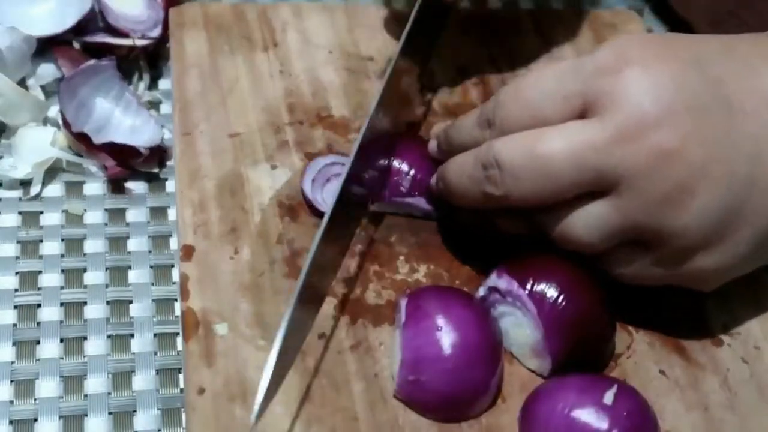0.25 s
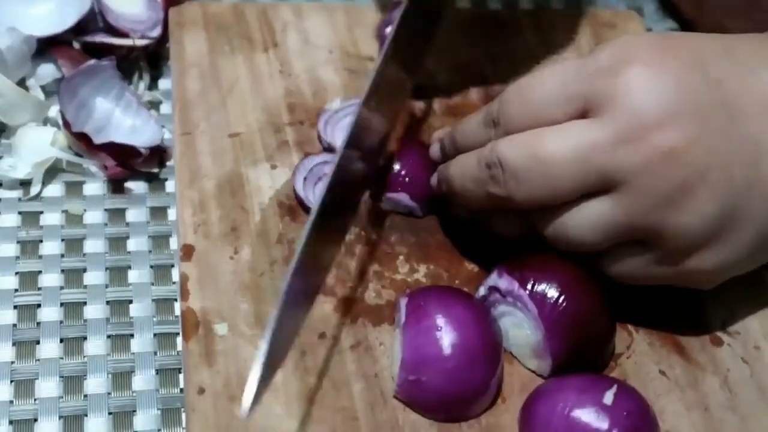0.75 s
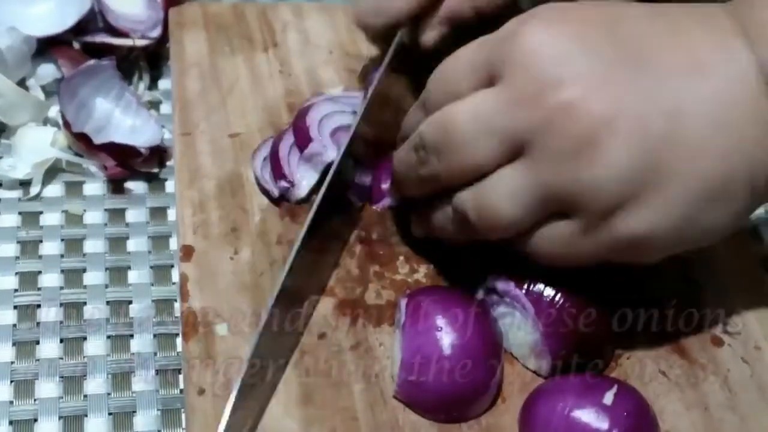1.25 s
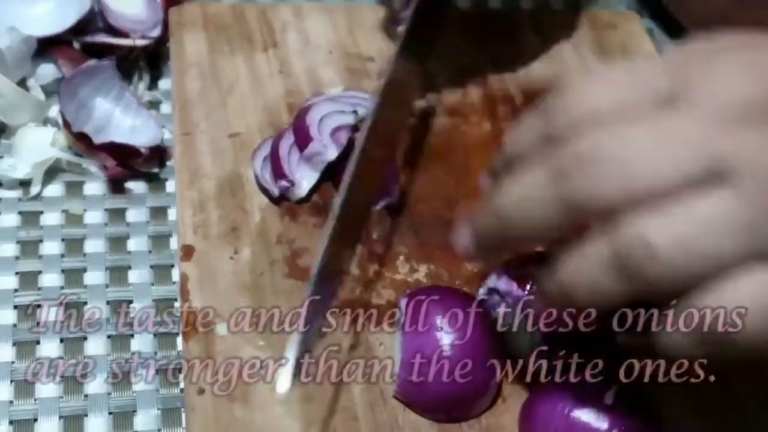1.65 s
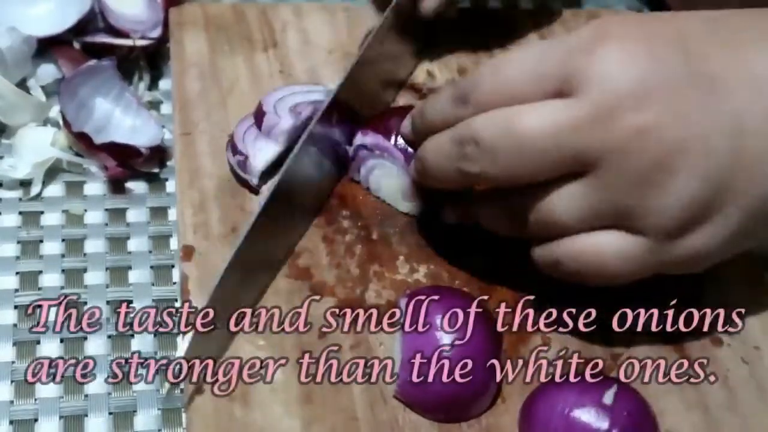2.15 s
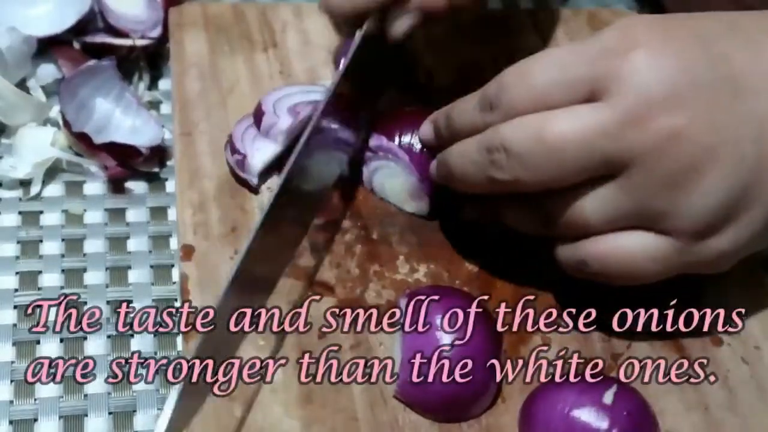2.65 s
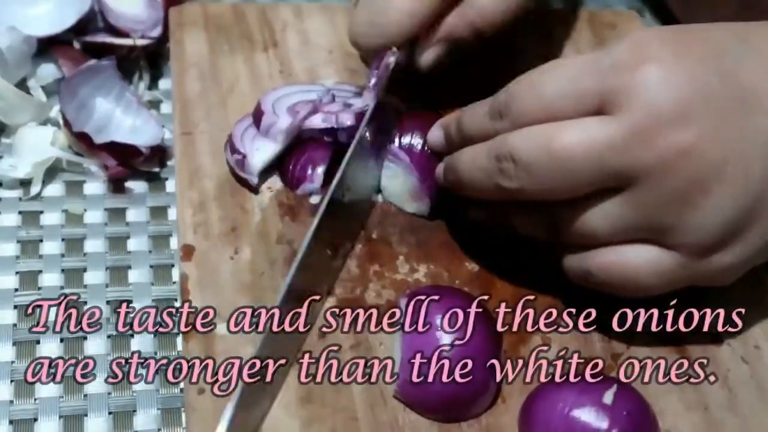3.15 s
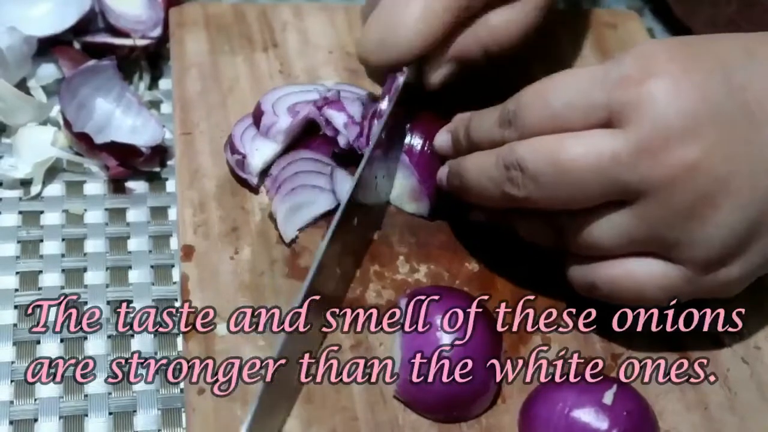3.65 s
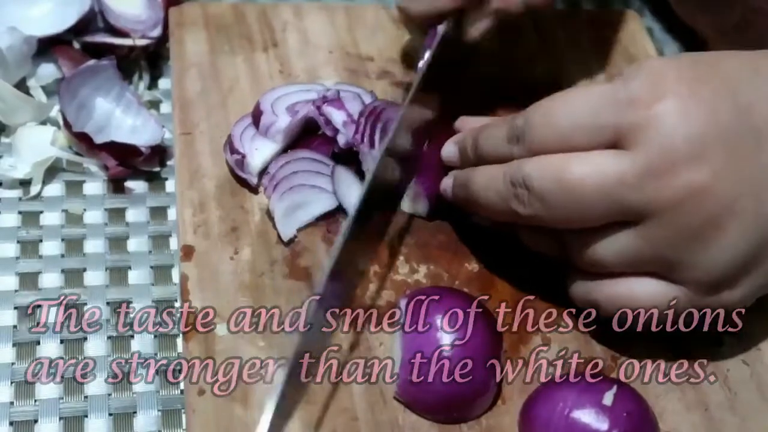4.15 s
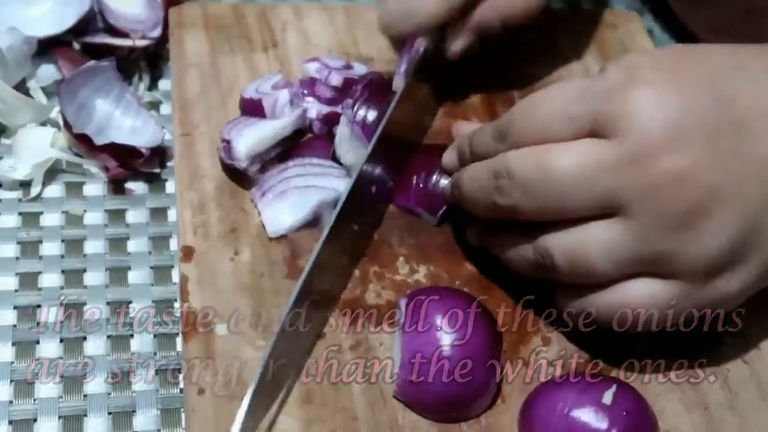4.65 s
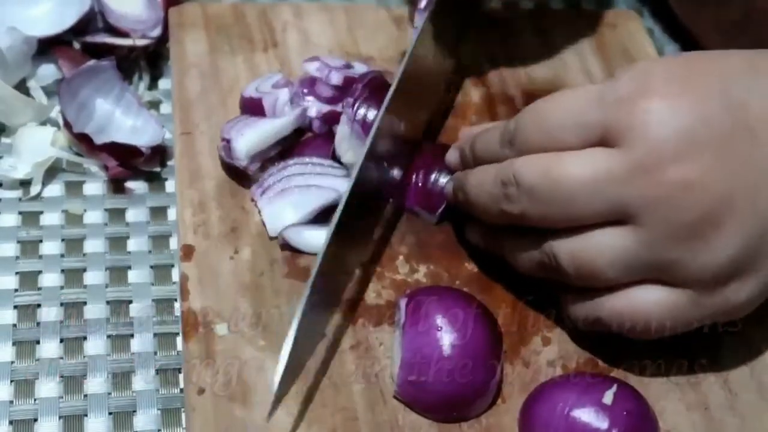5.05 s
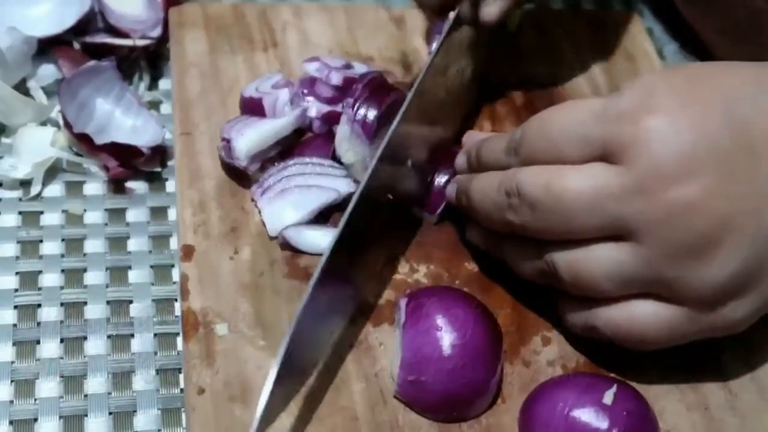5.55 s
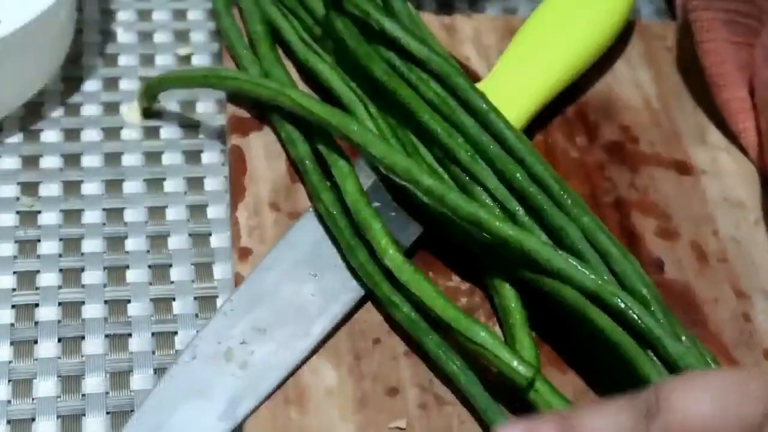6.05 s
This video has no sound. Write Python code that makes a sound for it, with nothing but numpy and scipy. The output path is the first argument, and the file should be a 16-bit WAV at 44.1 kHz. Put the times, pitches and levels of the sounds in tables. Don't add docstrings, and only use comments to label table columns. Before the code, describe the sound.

A knife crunches through wet onion and knocks on a wooden cutting board in uneven strokes, close up, over a faint wavering kitchen hum.

```python
import sys
import numpy as np
from scipy import signal
from scipy.fft import rfft, irfft, next_fast_len
from scipy.io import wavfile
from scipy.ndimage import uniform_filter1d

SR = 44100
rng = np.random.default_rng(int(sys.argv[2]) if len(sys.argv) > 2 else 0)


def volts(x):
    e = np.asarray(x, float) / 20
    return 10 ** e


def transcribe(signal):
    frames = np.atleast_2d(signal).T
    limited = np.clip(frames, -1, 1)
    pcm = np.round(limited * 32767).astype(np.int16)
    wavfile.write(sys.argv[1], SR, pcm)


N = 277314


def evened(x):
    return x / np.sqrt(np.mean(x ** 2) + 1e-20)


def read(points, hz):
    f, value = np.transpose(points)
    return np.interp(np.log(hz + 1), np.log(f + 1), value)


# (frequency [Hz], share [0-1])
TREBLE_SHARE = [(3000, 1), (6000, .6), (8000, .25), (10000, .12), (14000, .04)]


def thinned(x):
    hz, t, z = signal.stft(x, SR, nperseg=1024)
    share = np.clip(read(TREBLE_SHARE, hz), .02, 1)[:, None]
    draws = np.repeat(rng.random((len(t), len(hz))), 2, axis=0)[:len(t)].T
    kept = draws < share
    return signal.istft(z * (kept / np.sqrt(share) + .02), SR, nperseg=1024)[1][:, :N]


# (frequency [Hz], level [dB per Hz])
HUM_COLOUR = [(12, -65), (20, -16), (47, 1), (85, -10.5), (140, -10.5), (202, -6), (274, -10.5),
              (393, -19.5), (725, -17), (1010, -21.5), (1410, -24), (2330, -25.5), (2680, -27),
              (5530, -38.5), (15500, -59)]
# (frequency [Hz], likeness [-1 to 1])
HUM_LIKENESS = [(60, 1.0), (180, 1), (550, 0.73), (1650, 0.77), (4970, 0.12), (15000, -1.3)]
# (time [s], level [dB])
HUM_DRIFT = [(0, -51.5), (.5, -50.5), (.96, -51), (1.47, -42), (1.79, -46.5), (2.29, -42.5), (2.45, -53.5),
             (2.8, -44), (3, -50.5), (3.6, -51.5), (4.1, -48.5), (4.5, -46), (5.3, -42.5), (5.55, -50),
             (5.9, -44.5), (6.29, -45.5)]
RUMBLE_DB = 3
DUCK_FROM_DB, DUCK_SHARE, RECOVER_DB_PER_S = -43.5, 0.15, 103.5


def hum(board):
    frames, hz = N // 128 + 5, np.fft.rfftfreq(512, 1 / SR)
    a, b, c, d, patches = rng.standard_normal((frames, 257, 5)).T
    patches = uniform_filter1d(patches, 6, axis=0)
    patches = evened(uniform_filter1d(patches, 10, axis=1))

    same = np.clip(read(HUM_LIKENESS, hz), -1, 1)[:, None]
    left = a + 1j * b
    right = same * left + np.sqrt(1 - same ** 2) * (c + 1j * d)
    z = np.array([left, right])

    t = np.arange(frames) * 128 / SR
    power = abs(uniform_filter1d(board ** 2, size=1600))
    stroke_db = np.interp(t, np.arange(N) / SR, 10 * np.log10(power + 1e-12))
    bass = 1 / (1 + (hz[:, None] / 400) ** 2)
    hush_db = (1.5 - bass) * 0.13 * np.maximum(stroke_db + 29, 0)

    fall = t * RECOVER_DB_PER_S
    peak_db = np.maximum.accumulate(stroke_db + fall) - fall
    duck_db = DUCK_SHARE * np.maximum(peak_db - DUCK_FROM_DB, 0)

    s, level_db = np.transpose(HUM_DRIFT)
    drift_db = np.interp(t, s, level_db)
    colour_db = read(HUM_COLOUR, hz)[:, None] + bass * RUMBLE_DB
    z *= volts(colour_db + 1.8 * patches + drift_db - duck_db - hush_db)
    return volts(35.0) * signal.istft(z, nperseg=512, noverlap=384)[1][:, :N] / 30


# (frequency [Hz], time [s])
ECHO_TIME = [(200, 0.69), (900, 0.12), (2300, 0.033), (3500, 0.02), (9000, 0.016)]


def room(x):
    taps = np.zeros((2, 16000))
    at = np.arange(200, 15980, 20) + rng.integers(0, 20, (2, 789))
    np.put_along_axis(taps, at, rng.choice([-1., 1.], at.shape), 1)
    taps[1] = .98 * taps[0] + .15 * taps[1]
    hz, t, z = signal.stft(taps, SR, nperseg=256)
    tail = signal.istft(z * volts(-60 * t / read(ECHO_TIME, hz)[:, None]), SR, nperseg=256)[1]
    return signal.fftconvolve(x[None], tail / np.linalg.norm(tail[0]), axes=1)[:, :N]


def ring(modes, cycles=.5):
    t, x = np.arange(4096) / SR, np.zeros(4096)
    for k, (hz, width, db) in enumerate(modes):
        swell = (1 - np.exp(-t * hz / cycles)) ** 2
        x += (-1) ** k * volts(db) * swell * np.exp(-np.pi * width * t) * np.sin(2 * np.pi * hz * t)
    return x / abs(x).max()


def grains(per_s, spread_db):
    size = volts(spread_db * np.minimum(rng.exponential(1, N), 4)) * rng.choice([-1, 1], N)
    return size * (rng.random(N) < per_s / SR)


def clumps(size, depth_db):
    drift = evened(uniform_filter1d(rng.standard_normal(N), size))
    return evened(volts(depth_db * drift))


def rubbed(slips, gain, body):
    return signal.oaconvolve(evened(slips) * gain, body / np.linalg.norm(body))[:N]


# (time [s], length [s], crunch [dB], table push [dB])
LIGHT_TOUCHES = [(0.61, 0.0072, -55.5, -36), (.815, 0.0056, -62, -65), (0.995, 0.025, -52, -36),
                 (1.352, .012, -51.5, -50), (2.199, 0.03, -48, -47), (2.635, 0.027, -48, -41),
                 (2.723, 0.031, -55.5, -42), (3.134, 0.055, -54, -42), (3.426, 0.021, -48.5, -39.5),
                 (3.647, 0.023, -54.5, -62.5), (3.732, 0.019, -48, -44.5), (3.894, 0.027, -46.5, -36.5),
                 (3.948, 0.0083, -47.5, -42), (4.198, 0.007, -52, -54.5), (4.574, .015, -54, -32.5),
                 (4.917, 0.022, -50.5, -60), (5.249, 0.035, -45.5, -39), (5.445, 0.028, -64, -31),
                 (5.602, 0.0049, -54, -55), (5.699, 0.015, -48, -53)]
# (time [s], length [s], crunch [dB], rub on the board [dB], table push [dB])
LAYER_CUTS = [(.089, 0.035, -42.5, -38, -34), (0.432, 0.039, -37.5, -38, -31),
              (0.701, 0.049, -42.5, -39.5, -38.5), (1.018, 0.025, -42.5, -50, -34.5),
              (1.319, 0.029, -39.5, -34, -29.5), (1.576, 0.05, -45, -48, -41.5),
              (2.21, 0.032, -47, -37, -37.5), (2.354, 0.028, -37.5, -50, -38),
              (2.659, 0.031, -33.5, -63, -27), (2.864, .033, -27.5, -45, -23.5),
              (3.172, 0.032, -27.5, -37, -32), (3.408, .018, -39, -34, -29.5),
              (3.439, .016, -37.5, -56.5, -36.5), (3.68, 0.052, -43, -48, -33.5),
              (3.925, 0.021, -39, -43, -29), (3.956, 0.021, -34.5, -25.5, -26),
              (4.211, 0.057, -41, -41.5, -33.5), (4.74, 0.012, -36, -33, -27),
              (4.947, 0.029, -34, -32, -23.5), (5.22, 0.033, -41, -37, -35),
              (5.243, 0.011, -27.5, -30.5, -52), (5.459, 0.03, -35, -35, -42.5),
              (5.479, 0.018, -34.5, -33, -34), (5.736, 0.029, -30, -36.5, -26.5)]
# (time [s], length [s], lower ring [dB], upper ring [dB], table push [dB])
BOARD_SKIDS = [(0.121, 0.031, -34, -36, -41.5), (.466, 0.035, -35, -36, -44),
               (.742, 0.018, -36.5, -33, -39.5), (0.759, 0.011, -27, -38.5, -61),
               (1.043, 0.037, -26, -53, -27), (1.338, 0.012, -25.5, -44.5, -31),
               (1.627, 0.014, -35.5, -30, -28.5), (1.632, 0.03, -30.5, -31.5, -35.5),
               (1.823, 0.0063, -26.5, -50, -27.5), (2.381, 0.035, -34, -26, -36),
               (2.688, 0.034, -29.5, -64, -32.5), (2.901, 0.022, -39, -35.5, -40),
               (3.221, 0.015, -38.5, -48, -46), (3.462, 0.011, -27.5, -26, -29),
               (3.49, 0.012, -48, -47, -83), (3.718, 0.024, -36, -64, -27),
               (3.965, .021, -25.5, -22.5, -31.5), (4.004, 0.018, -49, -61, -53),
               (4.266, 0.027, -29, -56, -39.5), (4.602, 0.029, -29.5, -32, -45),
               (4.757, 0.0081, -22.5, -43.5, -18), (4.76, 0.015, -27, -55, -41),
               (4.963, 0.016, -22, -63, -32), (5.496, 0.0385, -37.5, -65, -53)]
TOUCH_RUB_DB = -7
CUT_UPPER_DB = -5.5
SKID_CRUNCH_DB = -24
SETTLE_DB, SETTLE_S, SETTLE_FADE_DB = -13.5, 0.077, -22.5
PULP_GONE_DB = -11


def phases():
    rows = []
    for s, length, crunch_db, push in LIGHT_TOUCHES:
        rub = crunch_db + TOUCH_RUB_DB
        rows.append((s, length, crunch_db, rub, rub, push, 0))
    for s, length, crunch_db, rub, push in LAYER_CUTS:
        rows.append((s, length, crunch_db, rub, rub + CUT_UPPER_DB, push, 0))
    for s, length, lower, upper, push in BOARD_SKIDS:
        levels_db = np.array([lower + SKID_CRUNCH_DB, lower, upper, push])
        settling_db = levels_db + (SETTLE_DB + np.array([PULP_GONE_DB, 0, 0, 0]))
        rows.append((s, length, *levels_db, 0))
        rows.append((s + length, SETTLE_S, *settling_db, SETTLE_FADE_DB))
    return rows


def held(axis):
    out = np.zeros(N)
    for row in phases():
        part = out[round(row[0] * SR):round((row[0] + row[1]) * SR)]
        part += volts(row[axis] + np.linspace(0, row[-1], len(part)))
    return uniform_filter1d(out, size=100)


# (frequency [Hz], level [dB per Hz])
CRUNCH_COLOUR = [(710, -38), (1200, -8.5), (2230, -1), (2540, -7), (3540, 1), (4930, -12), (6040, -19),
                 (6800, -19), (12800, -36.5), (15500, -52.5)]


def crunch():
    gain = held(axis=2) * clumps(size=150, depth_db=2.5)
    out, t = np.zeros(N), np.arange(256) / SR
    for hz in np.geomspace(1300, 14000, 16):
        pop = np.sin(2 * np.pi * hz * t) * t ** 2 * np.exp(-t * hz / 1.5)
        patch = clumps(size=400, depth_db=hz / 4000)
        level = volts(read(CRUNCH_COLOUR, hz)) * np.sqrt(hz / 3500)
        out += level * rubbed(grains(900, 3.0), gain * patch, pop)
    return volts(-4.0) * out


# (frequency [Hz], width [Hz], level [dB])
LOWER_MODES = [(888.3, 86, 4.5), (1041, 98, -1.5), (1133, 70, -3), (1373, 240, -4.5), (690, 160, -17),
               (485, 83, -14)]
# (frequency [Hz], width [Hz], level [dB])
UPPER_MODES = [(2266, 139, 9.5), (2070, 210, -9), (2400, 630, -18.5), (1717, 260, 8), (1724, 170, -9),
               (1410, 420, -0.5), (2500, 180, -17), (2240, 96, -22.5)]
# (frequency [Hz], width [Hz], level [dB])
MIDDLE_MODES = [(1293, 790, 3.5), (1596, 140, -0.5), (1565, 130, -3.5), (2050, 240, 4)]
# (frequency [Hz], width [Hz], level [dB])
TABLE_MODES = [(35.8, 41.4, -3), (62.6, 69, -2), (132.7, 81.3, -1), (160.7, 44.6, -4), (299, 56.7, -12)]


def strokes():
    lower_gain, upper_gain = held(axis=3), held(axis=4)
    push_gain = np.roll(held(axis=5), -128)
    lower = rubbed(grains(1500, 2.2), lower_gain, ring(LOWER_MODES, 0.32))
    upper = rubbed(grains(2000, 2.8), upper_gain, ring(UPPER_MODES, 0.78))
    push = rubbed(grains(400, 3), push_gain, ring(TABLE_MODES, 0.17))
    onion = crunch()
    middle = rubbed(grains(2000, 3.8), np.sqrt(abs(lower_gain * upper_gain)), ring(MIDDLE_MODES, 0.25))
    return onion + lower + upper + push + volts(-3.0) * middle


# (time [s], skin snap [dB], jolt to the board [dB])
LAYER_SNAPS = [(.0988, -43, -44), (.4387, -45, -24.5), (1.3254, -16, -46), (2.6642, -27, -24.5),
               (2.8697, -17.5, -44), (3.1752, -19.5, -31.5), (3.1905, -18, -18), (3.4103, -19.5, -52),
               (3.6849, -26, -27.5), (3.9362, -14.5, -21.5), (4.214, -30, -48.5), (4.2249, -32.5, -30.5),
               (4.9492, -15.5, -15.5)]
# (time [s], upper ring [dB],
# lower ring [dB], skin snap [dB])
BOARD_LANDINGS = [(0.4589, -22, -26, -20), (.7452, -25, -22.5, -48), (1.0482, -26.5, -14.5, -39),
                  (1.339, -9.5, -16.5, -16), (1.632, -1, -6.5, -10.5), (1.6533, -24.5, -19.5, -44),
                  (1.8181, -22.5, -15.5, -30.5), (2.3607, -27, -28, -21.5), (2.3862, -16, -39, -42),
                  (2.8835, -16.5, -19, -11), (2.897, -37, -22, -20), (3.1858, -30, -18, -36),
                  (3.2019, -0.5, -17, -11.5), (3.467, 3, -4.5, -8.5), (3.7108, -24.5, -28, -28.5),
                  (3.7224, -40.5, -23, -41), (3.9688, 4, -9, -8.5), (4.2454, -30.5, -28.5, -21.5),
                  (4.6073, -32, -15.5, -51), (4.6347, -25.5, -27, -61), (4.7543, -11.5, -1, -24),
                  (4.9683, -23.5, -15, -33), (5.2441, -19.5, -31, -17), (5.4866, -14.5, -31, -3.5),
                  (5.7395, -16, -14, -14), (5.757, -14, -24, -13.5)]
JOLT_UPPER_DB = -4
TICK_DB, HARD_TICK_DB, HARD_SLOPE = -26.5, -20, 1.8
DULL_DB = -12
SNAP_CONTACT_S, SOFT_CONTACT_S, HARD_CONTACT_S = 0.0011, 0.0023, 0.0012


def contacts():
    rows = []
    for s, snap, jolt in LAYER_SNAPS:
        rows.append((s, jolt + JOLT_UPPER_DB, jolt, snap, snap + TICK_DB, SNAP_CONTACT_S))
    for s, upper, lower, snap in BOARD_LANDINGS:
        tick = max(snap + TICK_DB, HARD_TICK_DB + HARD_SLOPE * upper)
        contact = SOFT_CONTACT_S if snap < lower + DULL_DB else SNAP_CONTACT_S
        rows.append((s, upper, lower, snap, tick, contact + HARD_CONTACT_S * volts(upper)))
    return rows


# (frequency [Hz], width [Hz], level [dB])
SNAP_MODES = [(3630, 310, 1), (2780, 550, 5.5), (3940, 180, -8.5), (4446, 1900, -16)]
# (frequency [Hz], width [Hz], level [dB])
BLADE_MODES = [(4800, 350, 6.5), (5980, 1300, 27.5), (7200, 450, -4.5), (7300, 350, -9), (8050, 600, -10.5),
               (10300, 600, -10), (11000, 500, -17), (12700, 900, -36)]
KICK_DB, KICK_S = -2.5, .00008


def knocks():
    t, out = np.arange(512) / SR, np.zeros(N + 8192)
    u = t / KICK_S - 4
    kick = (1 - u ** 2) * np.exp(-u ** 2 / 2)
    bodies = [(UPPER_MODES, 0.95, 0.061), (LOWER_MODES, 0.39, .08),
              (SNAP_MODES, 1.0, 0.21), (BLADE_MODES, 0.95, 0.42)]
    rows = contacts()
    chatter = rng.standard_normal((len(rows), 512))
    spots = rng.standard_normal((len(rows), 8, 2))
    for (s, *levels_db, contact), rattle, spot in zip(rows, chatter, spots):
        at = round(s * SR)
        rattle = rattle * np.exp(-t / max(contact, .0002))
        out[at:at + 512] -= volts(levels_db[2] + KICK_DB) * kick
        for db, (modes, cycles, loose) in zip(levels_db, bodies):
            moved = [(hz * (1 + .012 * a), width, mode_db + 1.6 * b)
                     for (hz, width, mode_db), (a, b) in zip(modes, spot)]
            force = loose * rattle + (t == 0)
            out[at:at + 4607] += volts(db) * signal.fftconvolve(force, ring(moved, cycles))
    return out[:N]


def scene():
    board, size = knocks() + strokes(), next_fast_len(N + 64)
    delay = np.exp(-2j * np.pi * 1 * np.arange(size // 2 + 1) / size)
    later = irfft(rfft(board, size) * delay, size)[:N]
    direct = np.array([volts(0.41) * later, board])
    return direct + volts(-34.0) * room(board) + thinned(hum(board))


def top_cut(x):
    return signal.sosfilt(signal.butter(12, 21850, fs=SR, output="sos"), x)


def record(dry):
    overloaded = dry / (1 + abs(dry) ** 6) ** (1 / 6)
    edge = signal.firwin(31, 14500, window=("kaiser", 7), fs=SR)[None]
    limited = signal.oaconvolve(overloaded, edge, "same")
    return top_cut(np.clip(limited, -1, 1))


dry = scene()
out = record(dry)
transcribe(out)
```